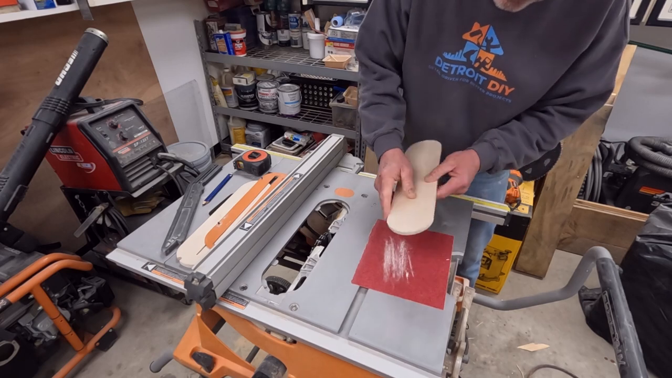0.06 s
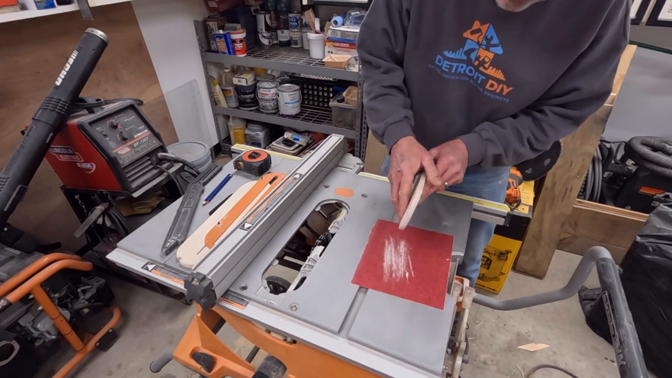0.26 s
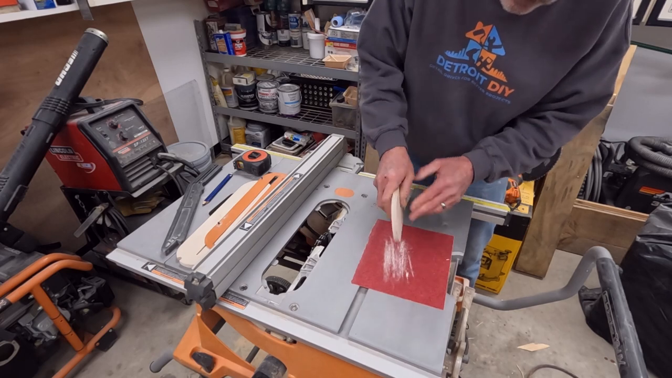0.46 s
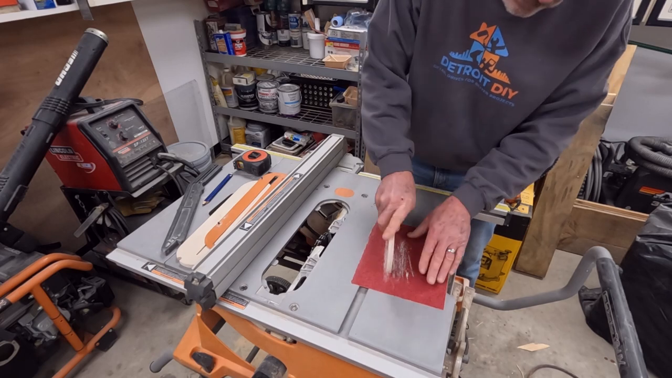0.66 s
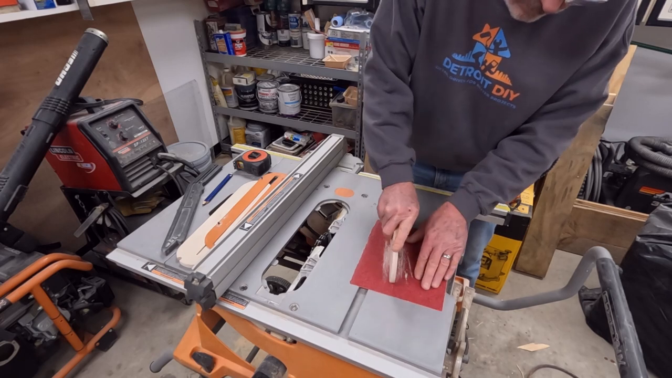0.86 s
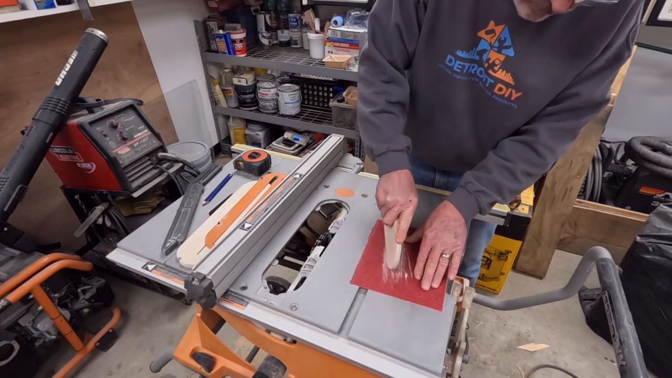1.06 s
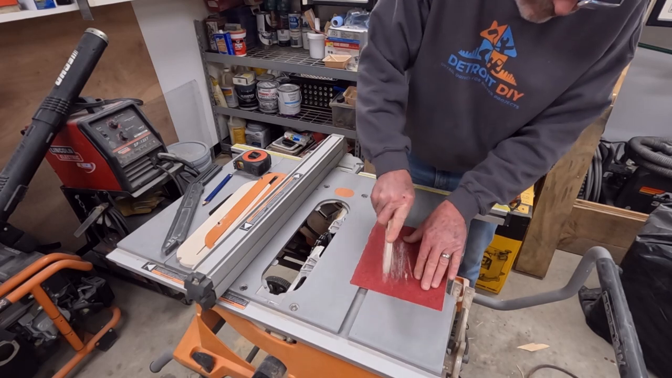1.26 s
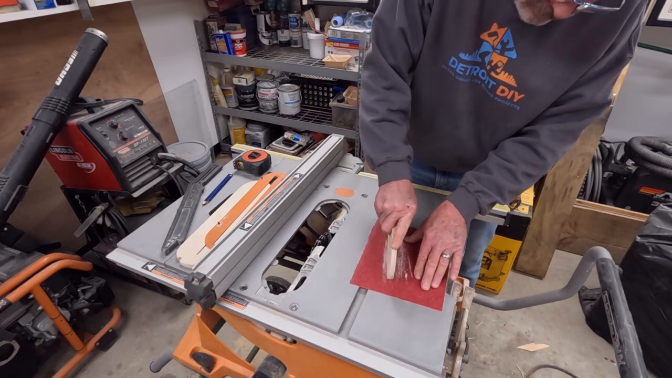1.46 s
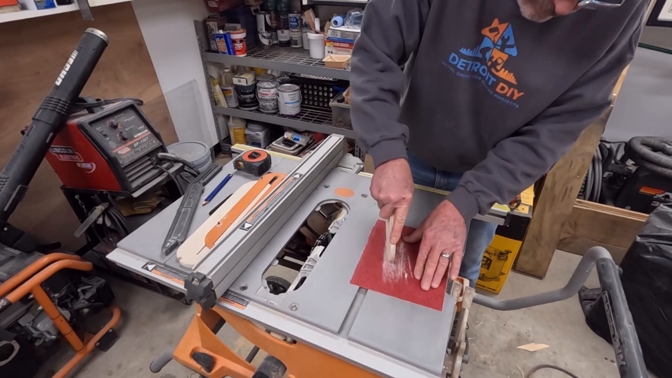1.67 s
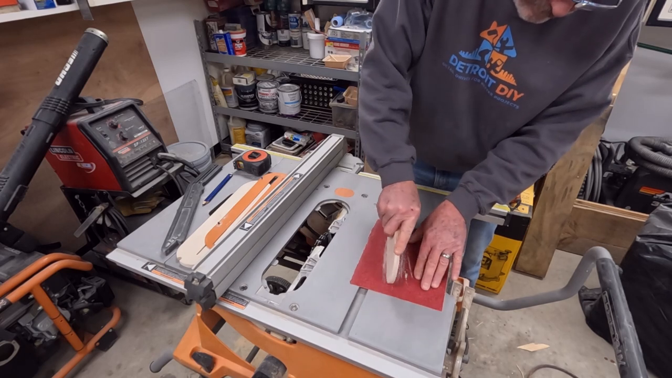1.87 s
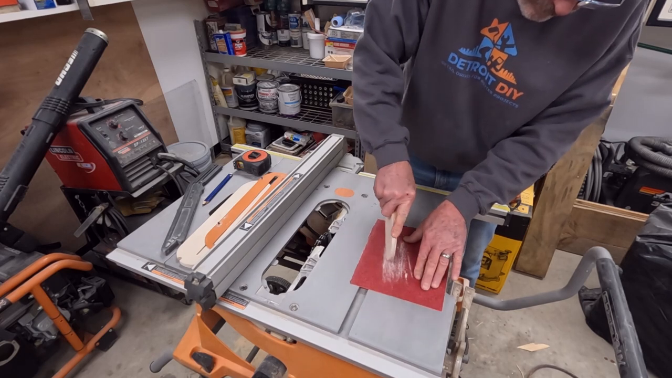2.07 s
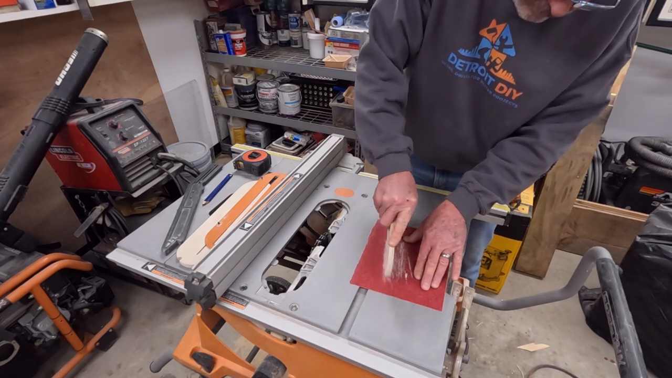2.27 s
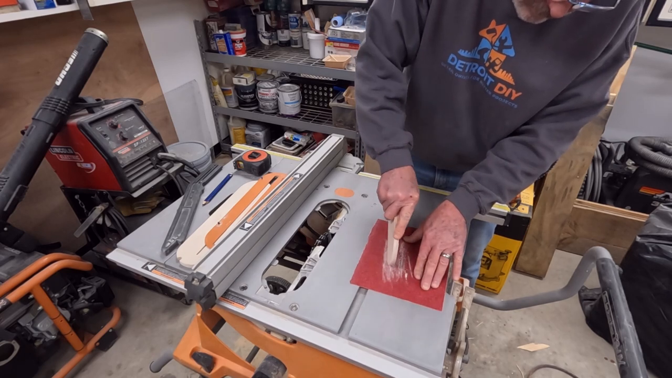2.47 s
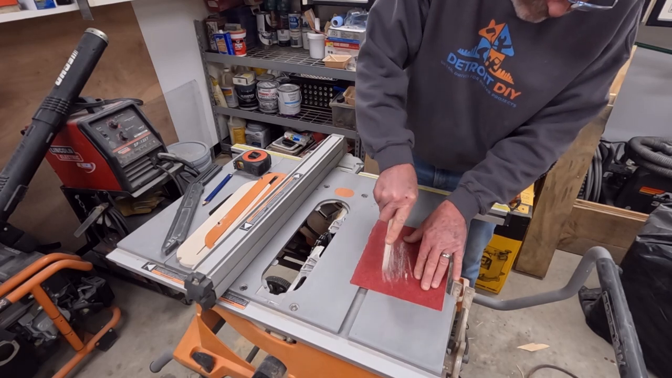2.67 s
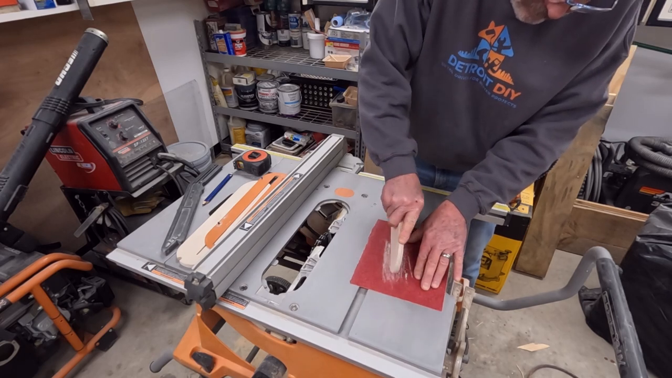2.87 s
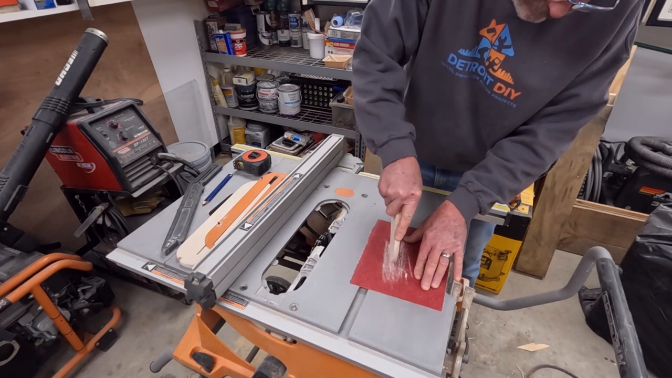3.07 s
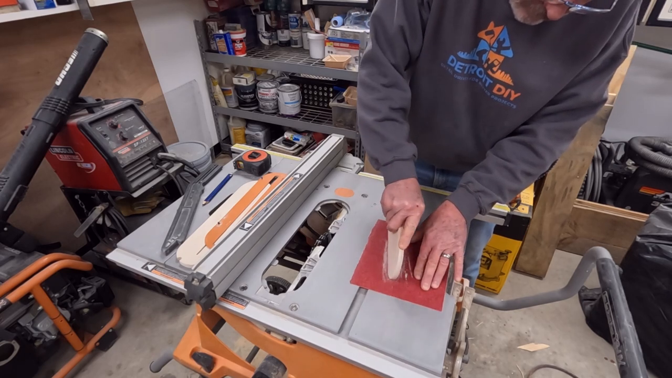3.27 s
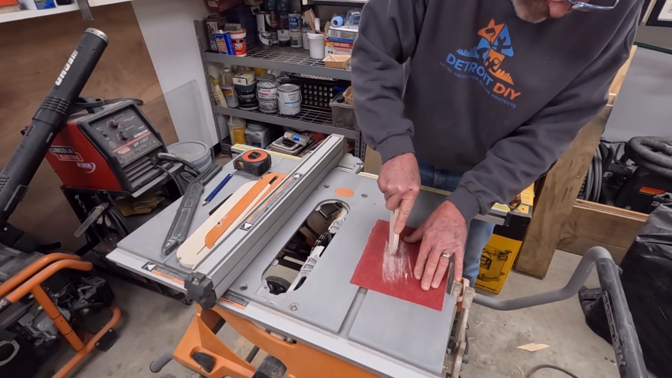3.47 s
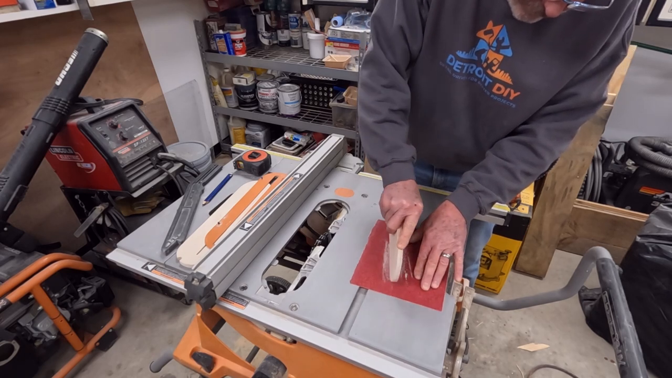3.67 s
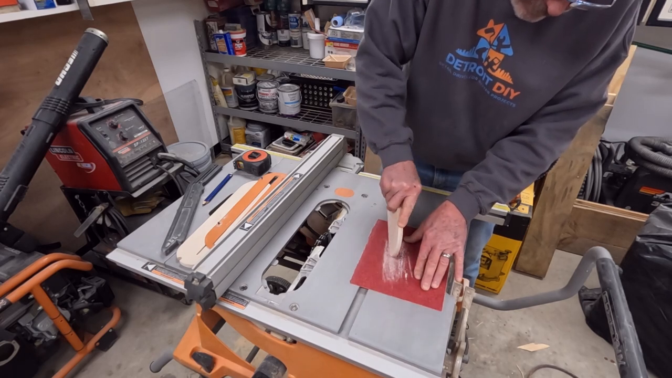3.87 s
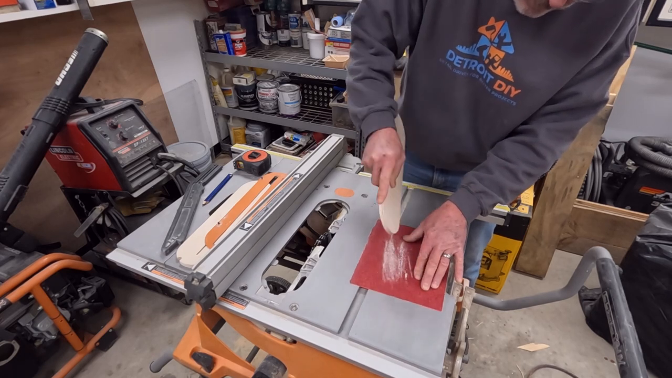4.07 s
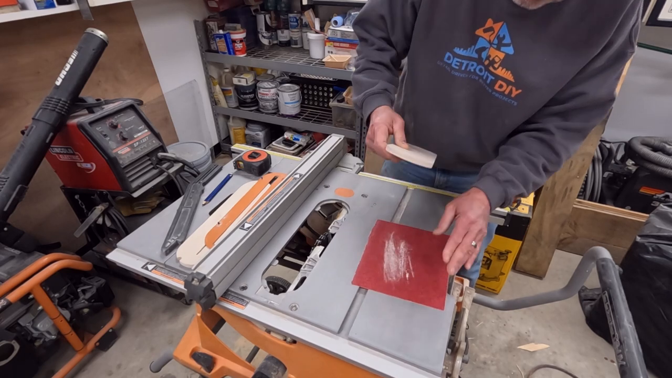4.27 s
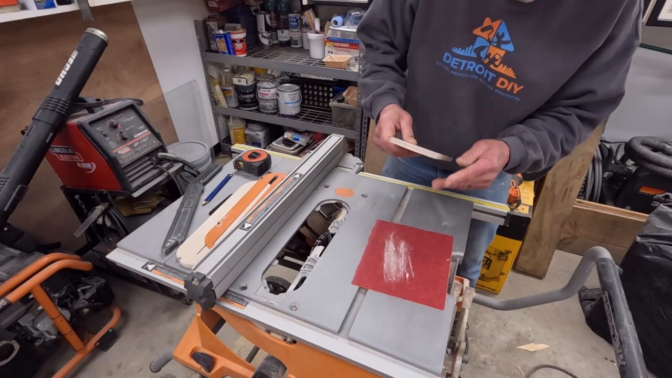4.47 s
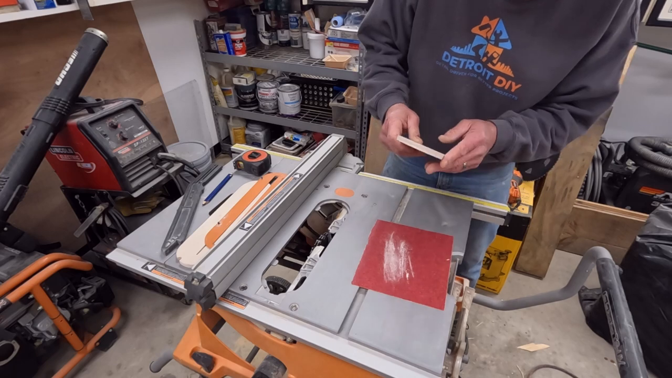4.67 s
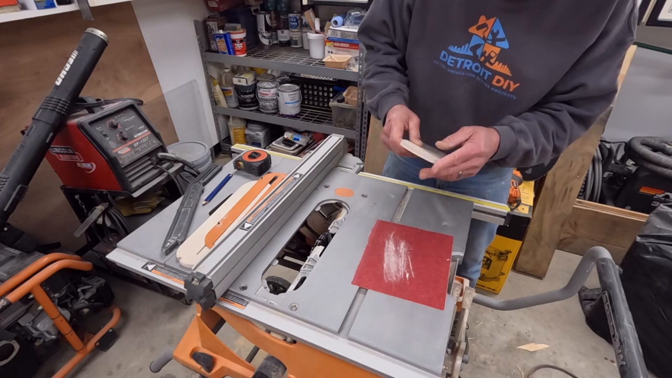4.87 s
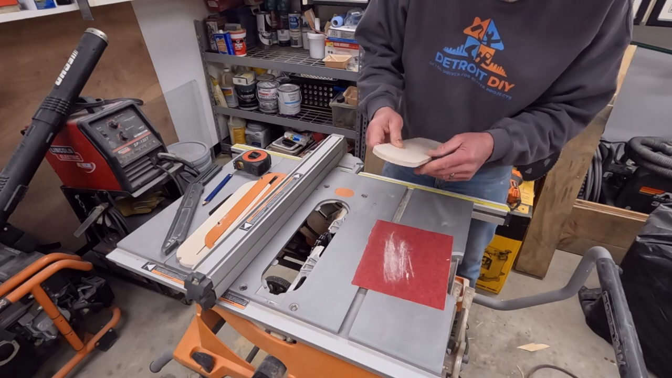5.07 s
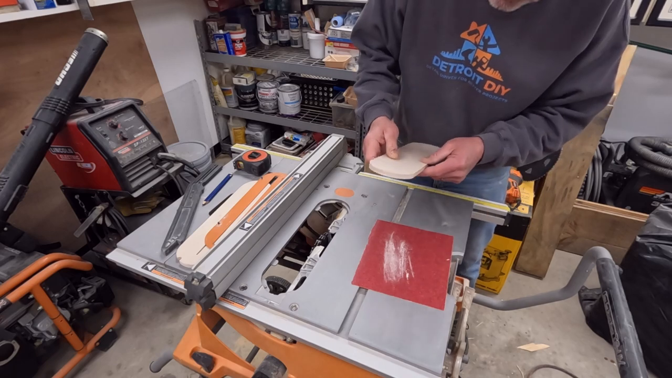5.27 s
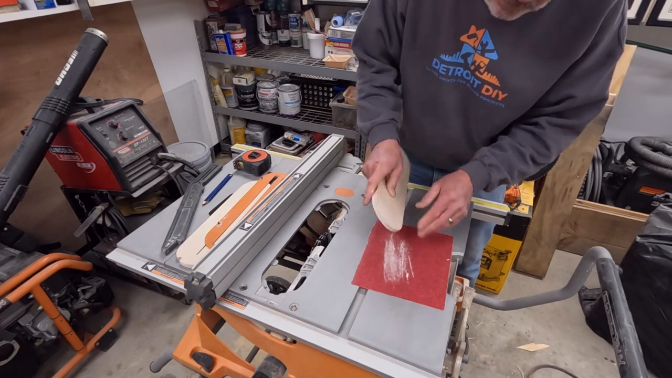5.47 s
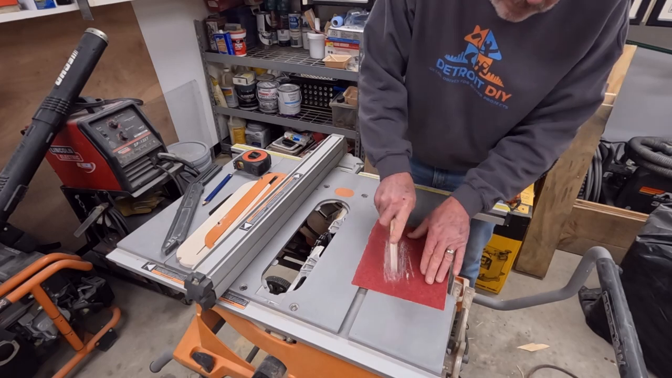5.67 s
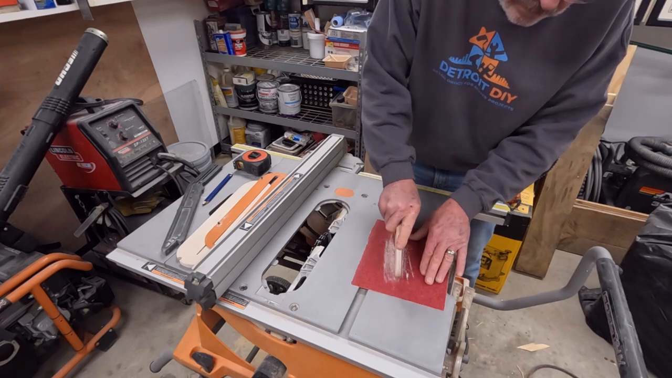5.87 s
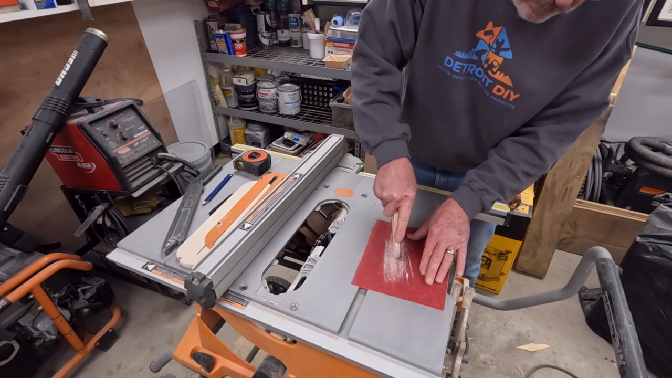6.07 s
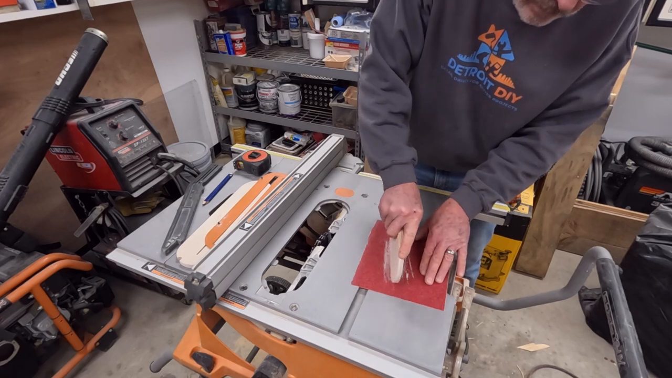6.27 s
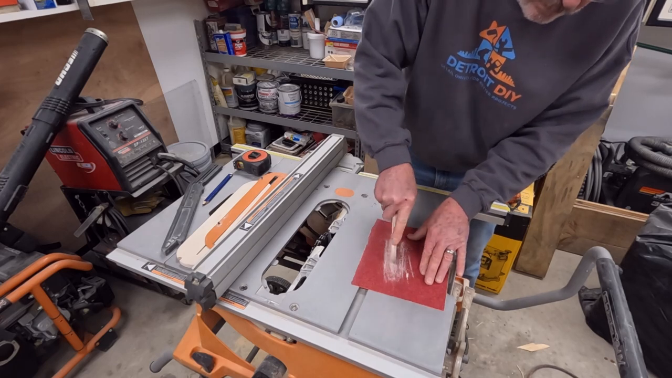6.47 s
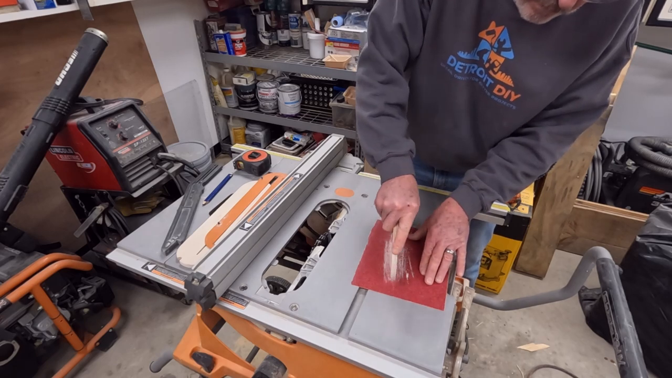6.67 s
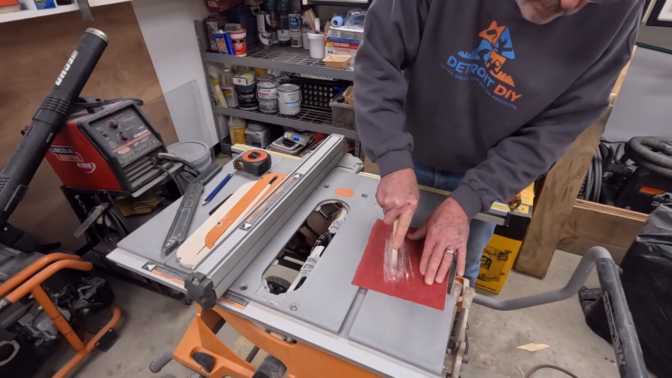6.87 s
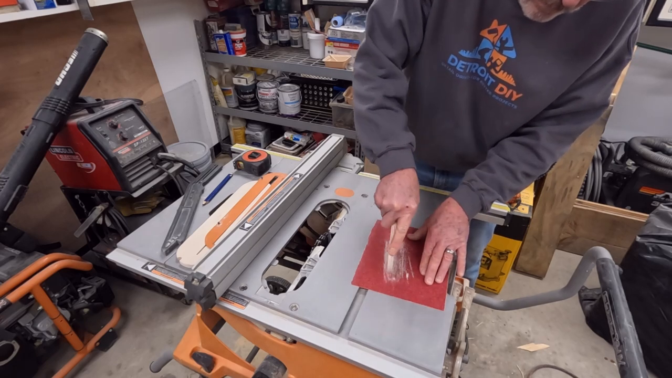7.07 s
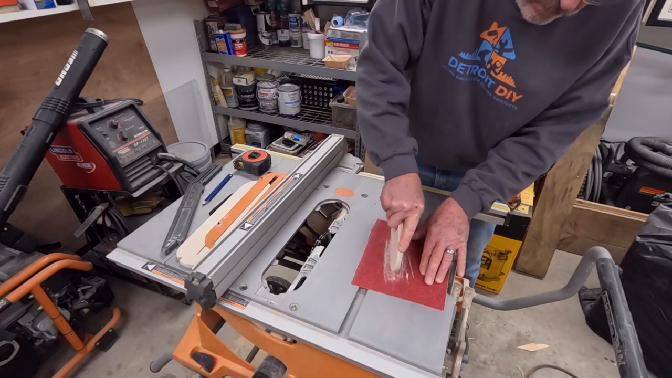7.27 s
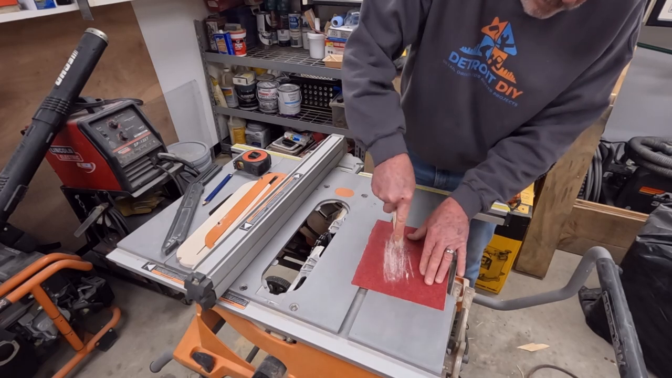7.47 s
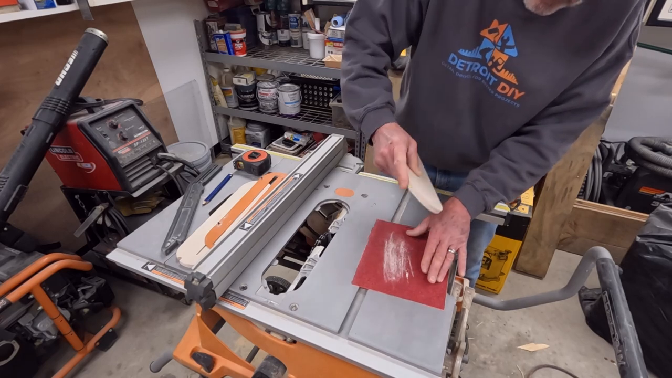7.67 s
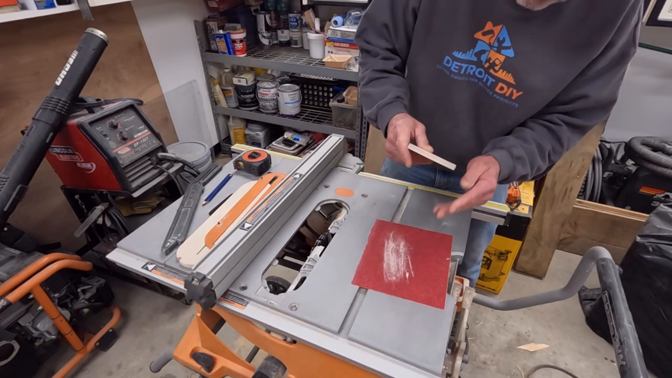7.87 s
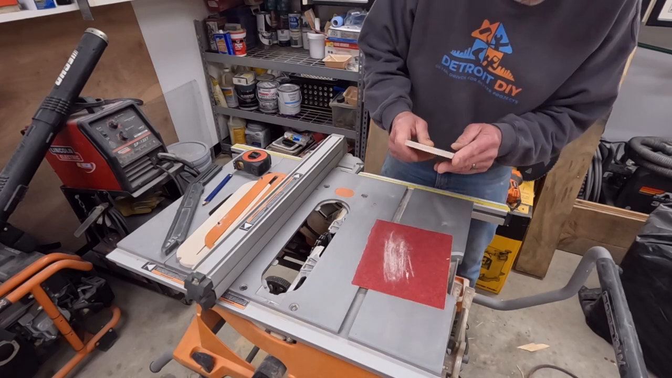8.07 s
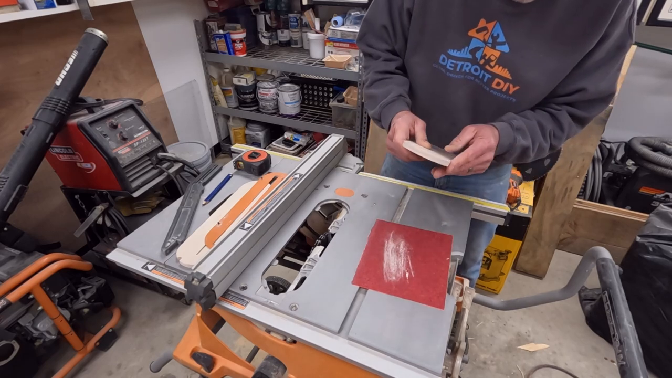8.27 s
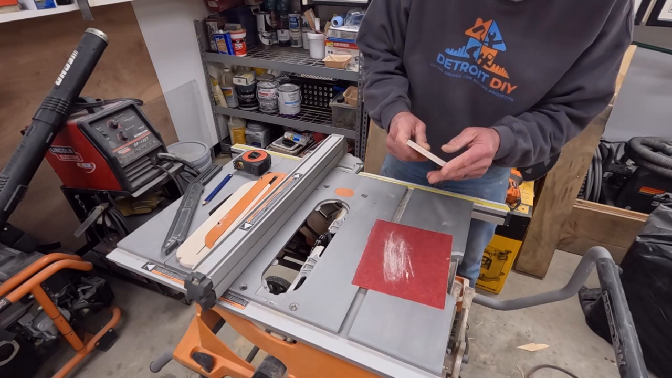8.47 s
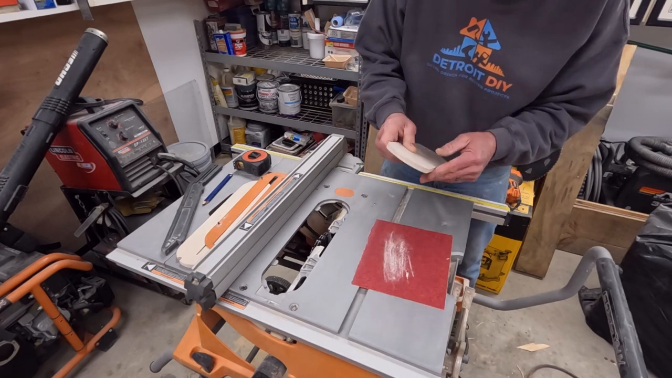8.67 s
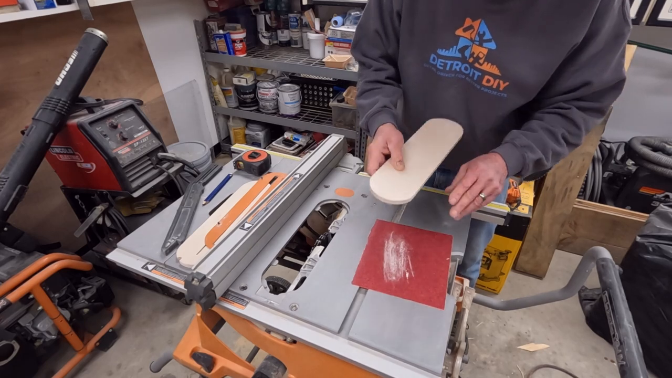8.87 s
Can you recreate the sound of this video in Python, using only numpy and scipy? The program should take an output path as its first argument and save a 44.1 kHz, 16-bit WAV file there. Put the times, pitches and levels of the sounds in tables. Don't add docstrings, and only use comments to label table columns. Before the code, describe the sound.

A thin plywood edge knocks hard onto sandpaper on a steel table and rasps in short strokes, with quiet finger handling between two bursts.

```python
import sys
import numpy as np
from scipy import signal
from scipy.fft import rfft, irfft, next_fast_len
from scipy.io import wavfile
from scipy.ndimage import uniform_filter1d, minimum_filter1d, map_coordinates

SR = 44100
rng = np.random.default_rng(int(sys.argv[2]) if len(sys.argv) > 2 else 0)


def dump(signal):
    limited = np.clip(np.atleast_2d(signal).T, -1, 1)
    pcm = np.round(limited * 32767).astype(np.int16)
    wavfile.write(sys.argv[1], SR, pcm)


def elevation(decibels):
    levels = np.asarray(decibels, float)
    return 10 ** (levels / 20)


N = 392919
SIZE = next_fast_len(N + SR // 4)
HZ = np.maximum(np.arange(SIZE // 2 + 1) * SR / SIZE, 1)
STEP = np.arange(0, N + 32, 32)

# start_s, peak_db, contact_ms, crack_db, thud_db
KNOCKS = [(0.819, 9.5, 1.08, -21, 3), (1.424, 9, 0.59, -13, -5.5), (1.897, 10, 0.72, -18, 0.5),
          (2.377, 12, 0.38, -7, -1), (2.8275, 8.5, 0.42, -7.5, 1), (3.23, 3.5, 1.6, -21, 0.5),
          (3.716, 8, 0.42, -13, -8), (5.807, 7, 0.69, -28, -1.5), (6.302, 5, 0.32, -11.5, -7),
          (6.767, 10.5, 0.35, -8.5, 1), (7.19, 3, 0.44, -26.5, -6)]
# pitch_hz, t60_s, knock_db, drag_db
BODY_MODES = [(143.8, 0.15, -18, -15.5), (234.9, 0.11, -4, -4.5), (276.6, 0.085, -2.5, -1),
              (338.2, 0.16, -4, -4), (427, 0.046, -27, -16.5), (461.5, 0.048, -25.5, 1), (502.3, 0.079, -7, 0),
              (545.6, 0.07, -9.5, -2.5), (658, 0.06, -5.5, 0), (700, 0.069, 4, -6.5), (759, 0.074, -4.5, -8.5),
              (876, 0.051, 1, -20.5), (979, 0.11, -6.5, -14),
              (1058, 0.016, 7.5, -12.5), (1326, 0.026, 2, 7), (1463, 0.056, -2, -15.5), (1816, 0.0064, 13.5, 9),
         (2020, 0.023, -5.5, -11), (2330, 0.0076, -18.5, -1), (2615, 0.0063, -2, 1),
         (2877, 0.02, -18, -6.5), (3540, 0.0086, -5, -13), (5064, 0.0071, -8.5, -2),
         (6070, 0.0075, -23, -10), (7500, 0.0049, -28, -12)]
BODY = BODY_MODES


def rms_one(x):
    return x / np.sqrt(np.mean(x ** 2) + 1e-20)


def gain_of(db):
    return np.interp(np.arange(N), STEP, elevation(db))


def drift(rate_hz):
    return map_coordinates(rng.standard_normal(2000), [STEP * rate_hz / SR], order=3)


def in_time(rows, on_db_per_s, off_db_per_s):
    start_s, hold_s, level_db, swell_db = np.transpose(rows)[:, :, None]
    t = STEP / SR - start_s
    db = level_db + swell_db * np.clip(t / hold_s, 0, 1)
    db = db + on_db_per_s * np.minimum(t, 0) - off_db_per_s * np.maximum(t - hold_s, 0)
    return 10 * np.log10(np.sum(elevation(2 * np.maximum(db, -120)), axis=0))


def at_hz(points, hz):
    return np.interp(np.log(hz), np.log(np.array(points)[:, 0]), np.array(points)[:, 1])


def colour(x, spectrum):
    return irfft(rfft(x, SIZE) * elevation(at_hz(spectrum, HZ)), SIZE)[:N]


def cut(x, hz, kind):
    return signal.sosfilt(signal.butter(2, hz, kind, fs=SR, output="sos"), x + 1e-18)


def ring(x, hz, t60_s):
    r, w = elevation(-60 / (t60_s * SR)), 2 * np.pi * hz / SR
    return signal.lfilter([0, np.sin(w)], [1, -2 * r * np.cos(w), r * r], x + 1e-18)


def grains(per_s, spread_db):
    sizes = elevation(spread_db * np.minimum(rng.exponential(1, N), 4)) * rng.choice([-1, 1], N)
    return rms_one(sizes * (rng.random(N) < per_s / SR))


def bright_one(response):
    return response / np.sqrt(np.mean(np.abs(response) ** 2 * (HZ > 2600)))


def patchy(catches, response, gain_db, patchy_db, from_hz):
    out, octave = 0, np.log2(HZ)
    for k, centre in enumerate(np.arange(np.log2(from_hz), 14.3, 0.5)):
        share = np.cos(np.pi * np.clip(octave - centre, -0.5, 0.5)) ** 2
        flicker_db = patchy_db * (drift(16) + drift(45))
        drive = catches[k % 2] * gain_of(gain_db(2 ** centre) + flicker_db)
        out = out + rfft(drive, SIZE) * share
    return irfft(out * response, SIZE)[:N]


def knocks():
    bounce_s, bounce_db = 0.022, -11
    slap_hz, slap_t60_s, slap_db = 580, 0.025, 7
    thud_hz, thud_t60_s = (430, 700), 0.14
    out, chance = np.zeros(N), rng.standard_normal((len(KNOCKS), len(BODY)))
    noise, t = rng.standard_normal((len(KNOCKS), 2, 6000)), np.arange(6000) / SR
    lag = round(bounce_s * SR)
    for (start_s, db, contact_ms, crack_db, thud_db), vary, (uneven, hiss) in zip(KNOCKS, chance, noise):
        push = np.sin(np.pi * np.clip(t * 1000 / contact_ms, 0, 1))
        landing = 0.096 * uneven * elevation(-60 * t / 0.015)
        landing[0] = 1
        landing[lag:] += elevation(bounce_db) * landing[:-lag].copy()
        push = np.convolve(push[:200] / push.sum(), landing)[:6000]

        body = elevation(slap_db) * ring(push, slap_hz, slap_t60_s)
        for k, (hz, t60_s, knock_db, _) in enumerate(BODY):
            body += (-1) ** k * elevation(knock_db + 1.57 * vary[k]) * ring(push, hz, 0.64 * t60_s)

        crack = cut(hiss * elevation(-60 * t / 0.039), [1500, 8000], "band")
        rattle = cut(hiss * elevation(-4 - 60 * t / 0.077), [900, 3500], "band")
        blur = uneven[::-1] * (elevation(-60 * t / 0.12) + 0.82 * elevation(-60 * t / 0.028))
        thud = cut(blur, [300, 900 / contact_ms], "band")
        thud = thud + 1.54 * cut(hiss[::-1] * elevation(-60 * t / thud_t60_s), thud_hz, "band")
        at = round(start_s * SR)
        out[at:at + 6000] += elevation(db - 7) * (body + elevation(thud_db) * thud + elevation(crack_db) * (crack + rattle))
    return cut(cut(out, 190, "high"), 100, "high")


def hand():
    # full_speed_s, hold_s, speed_db, swell_db, creep_db
    strokes = [(1.022, .16, -21, 2.5, -51), (1.527, 0.18, -23.5, 0, -41), (2.01, 0.15, -22.5, 2, -37.5),
               (2.501, 0.11, -27, 2, -37), (2.926, 0.13, -26, 2.5, -37), (3.332, 0.18, -24, 0, -54.5),
               (3.813, 0.17, -27, 6.5, -32.5), (5.936, 0.15, -22, -1, -46),
               (6.421, 0.15, -22.5, -1.5, -47.5), (6.881, 0.13, -28, 1.5, -83.5),
               (7.316, 0.14, -21, 1, -40.5)]
    # weight_db, ring_freedom_db
    grips = [(-3.5, -4), (-6, -2.2), (-4.5, -2.6), (-1, -4), (-4, -3), (-2.1, -2.5), (-4, -3.2),
             (-2.5, -2.5), (-3.5, -1.3), (-2.1, -2.3), (-5, -3)]
    settle_s = 0.045
    creeps = []
    for knock, (start_s, _, _, _, creep_db) in zip(KNOCKS, strokes):
        creep_s = knock[0] + settle_s
        creeps.append((creep_s, start_s - creep_s, creep_db, 0))
    speed_db = in_time(creeps + [row[:4] for row in strokes], on_db_per_s=336.5, off_db_per_s=1092.5)
    marks_s = [(s - 0.04, s, s + hold_s / 2, s + hold_s, s + hold_s + 0.05) for s, hold_s, *_ in strokes]

    def over_stroke(grip_db, creep_db, arch_db, lift_db):
        shape_db = grip_db[:, None] + [creep_db, 0, arch_db, lift_db, lift_db]
        return np.interp(STEP / SR, np.ravel(marks_s), np.ravel(shape_db))

    weight_db, freedom_db = np.transpose(grips)
    pressure_db = over_stroke(weight_db, creep_db=4.5, arch_db=3, lift_db=-1)
    ring_db = over_stroke(freedom_db, creep_db=-2, arch_db=0, lift_db=-1.5)
    return speed_db, pressure_db, ring_db


def drag():
    # pitch_hz, level_db_per_hz
    grit = [(150, -61.5), (230, -13.5), (600, -7.5), (1900, -11), (2200, -22), (3500, -19), (4100, -24),
            (6800, -29), (9500, -29), (13000, -39.5), (16000, -36)]
    speed_db, pressure_db, ring_db = hand()
    click = np.arange(SR // 2) == 0
    modes = 0
    for k, (hz, t60_s, _, drag_db) in enumerate(BODY):
        modes = modes + (-1) ** k * elevation(drag_db) * ring(click, hz, t60_s)
    modes = rfft(cut(modes, 220, "high"), SIZE) * elevation(-44.5)
    response = modes * np.sqrt(1 + (elevation(at_hz(grit, HZ)) / np.abs(modes)) ** 2)
    together = gain_of(drift(77))
    shared = grains(per_s=1800, spread_db=4)
    catches = [together * (0.63 * shared + grains(per_s=6000, spread_db=3)) for _ in "ab"]

    def gain_db(hz):
        low = at_hz([(800, 1), (1200, 0)], hz)
        middle = at_hz([(800, 0), (1200, 1), (2200, 1), (3000, 0)], hz)
        return speed_db - 5 + low * pressure_db + middle * ring_db

    return patchy(catches, bright_one(response), gain_db, patchy_db=1.94, from_hz=137.5)


def fingers():
    # start_s, hold_s, level_db, swell_db
    brushes = [(0.002, 0.011, -31, 2), (.078, 0.13, -36.5, -3), (.235, 0.071, -43.5, -4),
               (.32, 0.076, -41, 9), (.41, 0.08, -43.5, 4), (.49, 0.024, -35.5, 7), (.535, .05, -38, 1),
               (.603, 0.045, -30, -5), (.69, 0.049, -42, -.1), (.762, 0.028, -27.5, -11),
               (4.14, 0.028, -41, 10.5), (4.2, 0.061, -43, 0), (4.605, 0.01255, -53, 2),
               (4.68, .2, -52, 10.5), (5.015, 0.09, -39.5, -4.5), (5.228, 0.022, -44.5, -1),
               (5.29, 0.068, -44, 5), (5.4, 0.063, -39.5, 4), (5.47, .17, -42, 6.5),
               (5.722, 0.027, -32.5, -21), (7.58, .04, -41.5, -1), (7.7, 0.014, -39.5, 4),
               (7.74, 0.032, -46, -17), (7.81, .06, -45.5, 1), (7.88, 0.04, -61, 8.5),
               (8.16, 0.069, -54, 9.5), (8.345, 0.15, -44.5, -1), (8.592, 0.14, -37.5, 0.7)]
    # start_s, hold_s, level_db, swell_db
    palms = [(0.002, 0.012, -33.5, -1), (0.07, 0.26, -46, -5.5), (0.349, 0.084, -42.5, -3.5),
             (0.495, 0.22, -49.5, 1), (0.76, 0.053, -38.5, -7), (4.13, .16, -50, -8),
             (4.838, 0.17, -53.5, -4), (5.02, 0.21, -51.5, 3), (5.266, 0.2, -47.5, -3),
             (5.466, .2, -54.5, 1.5), (5.718, 0.055, -45.5, -5), (7.721, 0.076, -40.5, -16),
             (8.324, .2, -55, 8), (8.558, 0.24, -46, -7), (8.806, .1, -70, -5)]
    # start_s, hold_s, level_db, swell_db
    squeaks = [
        (0.352, 0.038, -46, 13),
        (0.482, 0.0078, -39, 5),
    ]
    # pitch_hz, level_db_per_hz
    skin_spectrum = [(1400, -22.5), (2300, 1), (2800, -6.5), (3100, 5.5), (3800, -0.5), (4200, -1),
                     (5300, 1), (6500, -4.5), (8500, -1.5), (11000, -8), (16000, -16.5)]
    # pitch_hz, level_db_per_hz
    wood_spectrum = [(120, -9), (300, -4.5), (700, -6.5), (1500, -4.5), (2500, -22), (16000, -53)]
    level_db, dull_db, squeak_db = (in_time(rows, on_db_per_s=1506, off_db_per_s=354)
                                    for rows in (brushes, palms, squeaks))
    fine = [grains(per_s=5000, spread_db=0.5) for _ in "ab"]
    response = bright_one(elevation(at_hz(skin_spectrum, HZ)))
    skin = patchy(fine, response, lambda hz: level_db - 4.5, patchy_db=3, from_hz=1370)
    dull = rms_one(colour(fine[0], wood_spectrum))
    squeak = rms_one(ring(ring(fine[1], 1800, 0.012), 1760, 0.015))
    return skin + gain_of(dull_db) * dull + gain_of(squeak_db) * squeak


def ticks():
    # start_s, peak_db, pitch_hz, t60_s
    tick_rows = [(0.076, -4, 2330, 0.019), (0.384, -49, 1760, 0.037), (0.762, -12, 4560, 0.03),
                 (0.976, -11, 910, 0.03), (1.031, -10, 1320, 0.028), (1.484, -6, 880, 0.065),
                 (1.584, -1, 1370, 0.03), (1.957, -2, 842, 0.027), (2.051, 3.5, 1300, 0.03),
                 (3.327, 2.5, 1780, 0.099), (3.879, 2.5, 1320, 0.041), (5.444, -13, 5290, 0.034),
                 (5.722, -16, 1330, 0.016), (5.931, 1, 1260, 0.027), (5.996, 9, 1290, 0.058),
                 (6.436, 0, 1280, 0.11), (7.239, -22, 907, 0.03), (7.264, -8, 4200, 0.02),
                 (7.361, -9, 1260, 0.028), (7.435, -15, 1390, 0.019), (7.703, -14, 3870, 0.02),
                 (7.72, -6, 3670, 0.026), (.077, -6, 1090, .03), (7.73, -14, 893.5, .06)]
    out, t = np.zeros(N), np.arange(3000) / SR
    for (start_s, db, hz, t60_s), hiss in zip(tick_rows, rng.standard_normal((len(tick_rows), 3000))):
        burst = hiss * elevation(-60 * t / t60_s)
        pitched = cut(burst, [hz * 0.82, hz * 1.3], "band") * np.sqrt(4000 / hz)
        wide = 0.5 * cut(burst, [500, 9000], "band")
        at = round(start_s * SR) - 20
        out[at:at + 3000] += elevation(db - 15) * (wide + pitched)
    return out


def taps():
    # start_s, level_db, t60_s
    tap_rows = [(1.338, -33, .08), (1.385, -29.5, 0.05), (1.867, -24.5, .07), (2.31, -32.5, 0.099),
                (3.639, -30, .08), (3.685, -37, 0.043), (5.385, -29, 0.03), (6.264, -25.5, 0.058),
                (8.108, -40, 0.12)]
    out, t = np.zeros(N), np.arange(5000) / SR
    for (start_s, db, t60_s), hiss in zip(tap_rows, rng.standard_normal((len(tap_rows), 5000))):
        puff = hiss * elevation(-60 * t / t60_s) * np.clip(t / 0.0026, 0, 1)
        dull = cut(puff, [750, 1250], "band")
        bright = 0.062 * cut(puff, [1250, 3500], "band")
        at = round(start_s * SR)
        out[at:at + 5000] += elevation(db + 14.5) * (dull + bright)
    return out


def garage(x):
    # pitch_hz, t60_s
    decay = [(200, 0.78), (400, 0.55), (800, 0.43), (3000, 0.47), (10000, 0.38)]
    tail_db = -9
    t = np.arange(SR) / SR
    white, tail = rng.standard_normal((2, SR)), 0
    for k, hz in enumerate(100 * 2.0 ** np.arange(8)):
        band = cut(white[k % 2], [hz / np.sqrt(2), hz * np.sqrt(2)], "band")
        tail = tail + band * elevation(-60 * t / at_hz(decay, hz)) * np.clip(t / 0.0099, 0, 1)
    return signal.fftconvolve(x, elevation(tail_db) * tail / np.sqrt(np.sum(tail ** 2)))[:N]


def air():
    # pitch_hz, level_db_per_hz
    floor_spectrum = [(12, -41), (20, 4.5), (40, -7.5), (120, -8), (168, -12), (193, -19), (228, -6),
                      (262, -16.5), (319, -7), (377, -18), (800, -18.5), (7110, -30), (8410, -28.5),
                      (16000, -37.5)]
    # pitch_hz, width_hz, level_db
    whine_band = (8420, 250, -65.5)
    floor_db = -49.5
    white = rng.standard_normal((2, N))
    floor = rms_one(colour(white[0], floor_spectrum))
    rumble = cut(floor, 130, "low")
    hz, width_hz, whine_db = whine_band
    whine = rms_one(cut(white[1], [hz - width_hz / 2, hz + width_hz / 2], "band"))
    unsteady = rumble * (gain_of(2.5 * drift(4)) - 1)
    return elevation(floor_db) * (floor + unsteady) + elevation(whine_db) * whine


def flecks(x):
    # pitch_hz, level_db_per_hz
    difference_spectrum = [(12, -58.5), (20, -15.5), (319, -4.5), (642, -7), (780, -7.5), (1260, -8),
                           (7950, -11), (13200, -14.5), (16000, -30)]
    fleck_share = 0.05
    loudness = np.sqrt(uniform_filter1d(x ** 2, size=800) + 1e-12) ** 0.46
    noise = rms_one(colour(rng.standard_normal(N), difference_spectrum))
    _, _, cells = signal.stft(loudness * noise, nperseg=1024)
    kept = rng.random(cells.shape) < fleck_share * rng.exponential(1, cells.shape[1])
    return elevation(-35) * signal.istft(cells * kept, nperseg=1024)[1][:N]


def scene():
    knock_room_db = -6
    blows = knocks()
    rubbing = drag() + fingers() + ticks() + taps()
    mono = blows + rubbing + garage(elevation(knock_room_db) * blows + rubbing) + air()
    return np.array([mono, mono])


def band_limit(x):
    return signal.sosfilt(signal.butter(12, 16990, fs=SR, output="sos"), x)


def record(dry):
    limit_share, limit_from_db, release_db_per_s = 0.48, -1.5, 193
    look_ahead = 600
    over_db = np.maximum(20 * np.log10(np.abs(dry[0]) + 1e-9) - limit_from_db, 0)
    fall_db = release_db_per_s * np.arange(N) / SR
    held_db = np.maximum.accumulate(over_db + fall_db) - fall_db
    ahead_db = -minimum_filter1d(-held_db, size=look_ahead, origin=-look_ahead // 2)
    x = dry * elevation(-limit_share * uniform_filter1d(ahead_db, size=300))
    x = 0.95 * x / (1 + np.abs(x / 0.95) ** 8) ** (1 / 8)
    x = x - cut(x - dry, 50, "low")
    x = x + flecks(x[0]) * [[1], [-1]]
    x = signal.sosfilt(signal.cheby2(10, 60, 16350, fs=SR, output="sos"), x)
    return band_limit(x)


dry = scene()
out = record(dry)
dump(out)
```